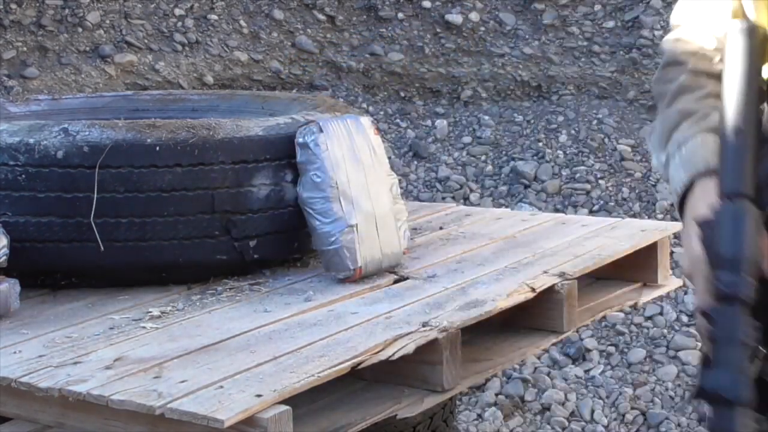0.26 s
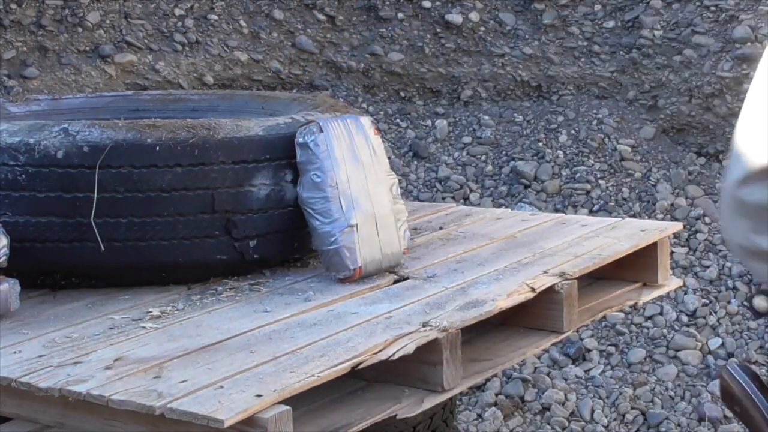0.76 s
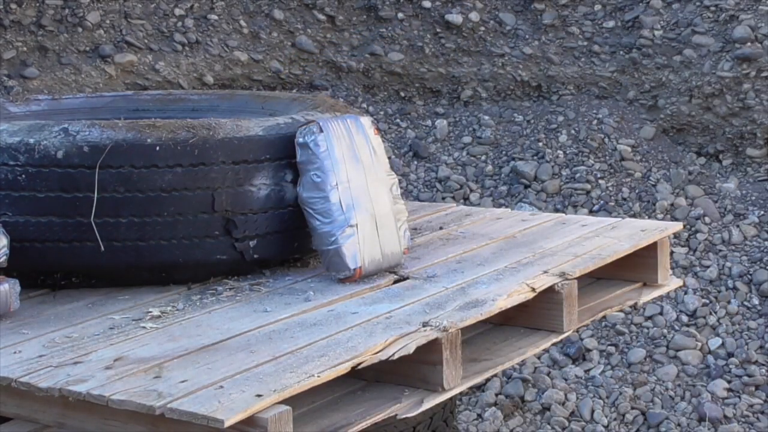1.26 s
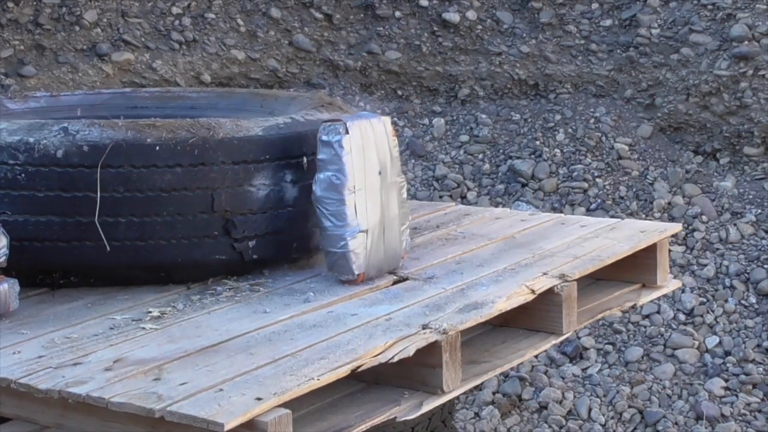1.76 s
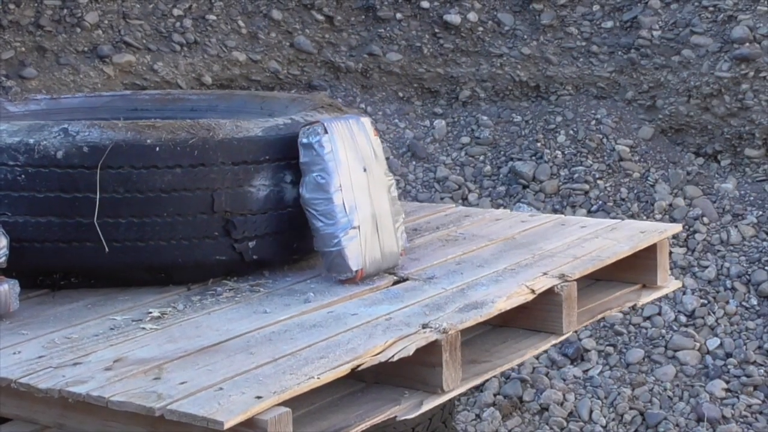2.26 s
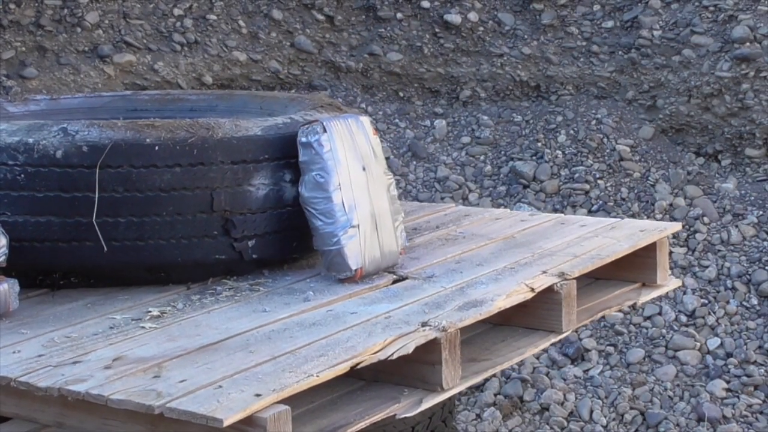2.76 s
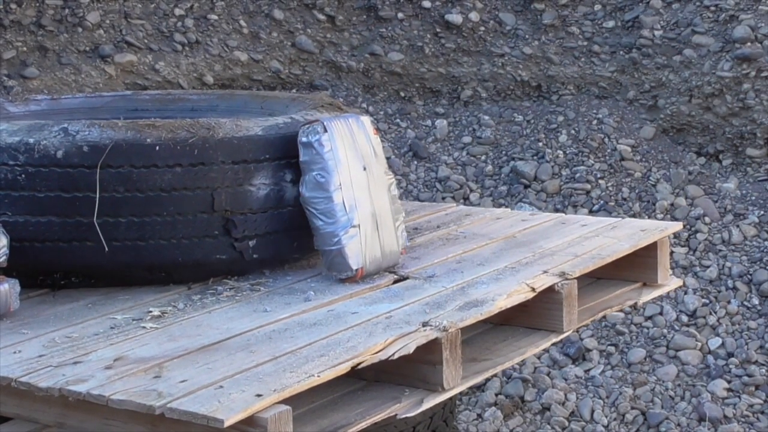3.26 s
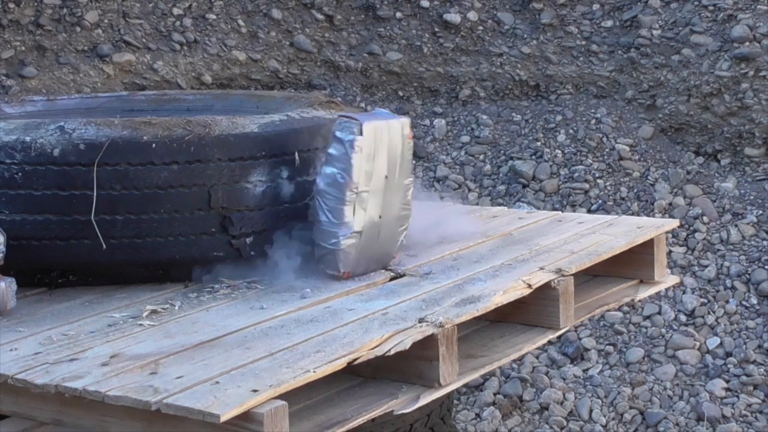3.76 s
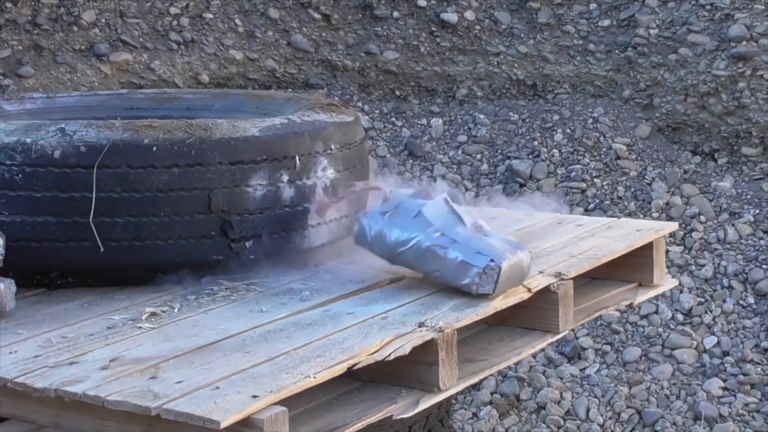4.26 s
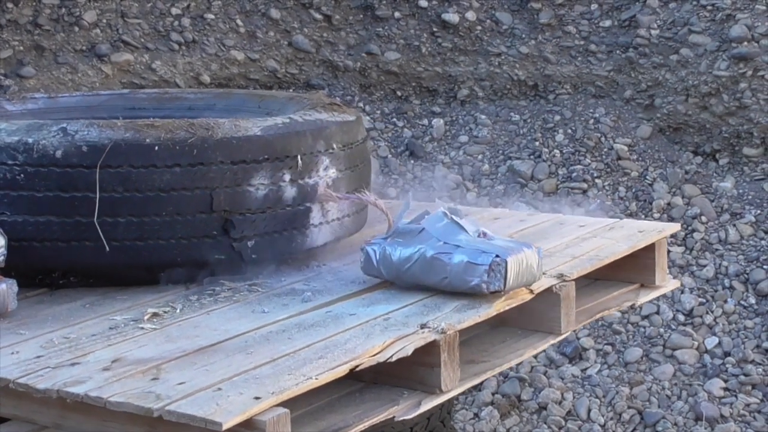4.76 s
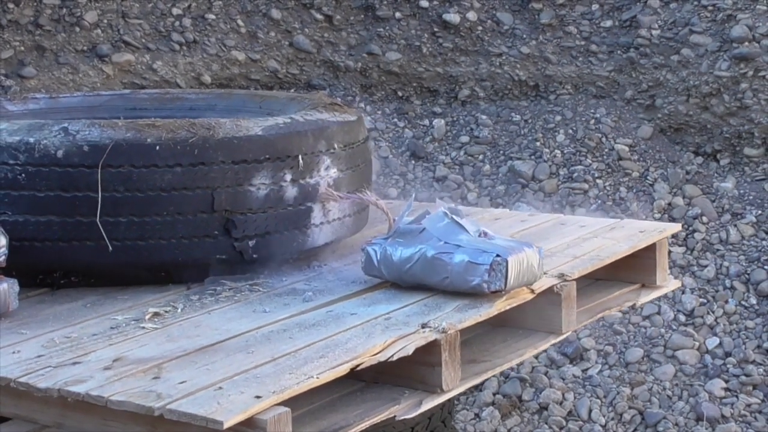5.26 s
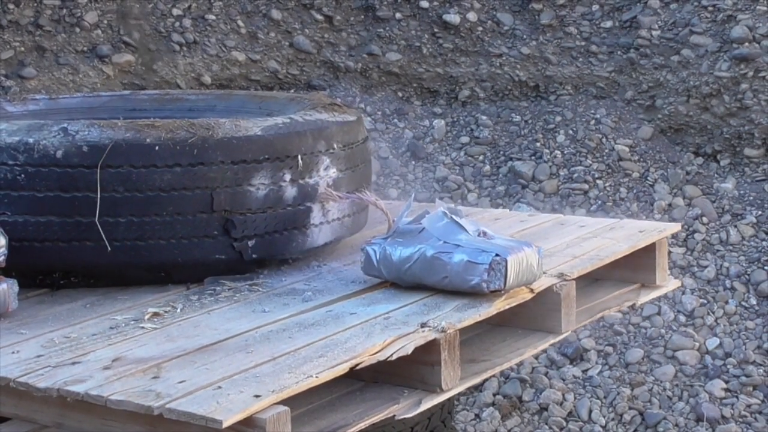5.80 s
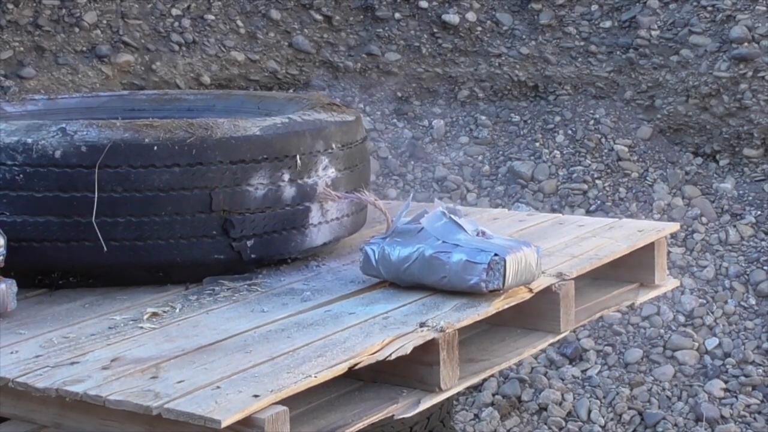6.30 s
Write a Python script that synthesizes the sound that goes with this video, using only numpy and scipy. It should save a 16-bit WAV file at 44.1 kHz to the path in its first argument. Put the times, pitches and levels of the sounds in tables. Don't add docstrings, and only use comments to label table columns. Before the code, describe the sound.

A close stereo microphone in an open gravel pit picks up faint air and a low murmur. From 0 to 1.1 seconds cloth rustles softly, with dull rifle-handling bumps, small grip taps and a very faint sinking whistle. At about 1.5 a rifle shot cracks and booms, extremely loud and squashed at its peak, then slaps off nearby banks, with a hollow metallic ring and dull far echoes. From 1.9 to 3.1 bright grit and splinters patter across both sides, brass tinkles thinly near 2.4 and 2.9, and a parcel rocks with muffled knocks. At 3.7 a second, similar shot erupts. Around 4.3 to 4.5 the parcel topples onto wooden boards with a sharp clatter, amid more debris and brass bounces, notably near 4.75. From 5.3 to the end at about 6.5, stones tick and trickle, gravel scrapes briefly, and a light woody thud lands near 5.9.

```python
import sys
import numpy as np
from scipy import signal
from scipy.fft import rfft, irfft, next_fast_len
from scipy.io import wavfile
from scipy.ndimage import uniform_filter1d, map_coordinates

SR = 44100
rng = np.random.default_rng(int(sys.argv[2]) if len(sys.argv) > 2 else 0)


def convert_level_to_amplitude(level_db):
    exponent = np.asarray(level_db, float) / 20
    return 10 ** exponent


def transcribe(signal):
    frames = np.atleast_2d(signal).T
    limited = np.clip(frames, -1, 1)
    pcm = np.round(limited * 32767).astype(np.int16)
    wavfile.write(sys.argv[1], SR, pcm)


N = 288325

# start in seconds, blast level in dB, fizz level in dB.
SHOTS = [
    (1.544, -8.5, -17),
    (3.7037, -8, -15.5),
]
# frequency in Hz, level in dB per Hz.
BLAST_COLOUR = [(24, -50.5), (40, -40.5), (80, -21), (113, -7), (250, -15.5), (325, -4), (500, -3),
                (719, -11.5), (841, -11.5), (916, -23), (1130, -17.5), (1830, -34), (2500, -35),
                (3250, -49.5), (5500, -120)]
FIZZ_COLOUR = [(1060, 5), (1800, -9.5), (2850, -10.5), (4530, -5.5), (5650, -9.5), (12500, -10),
               (15200, -17.5), (16300, -42.5)]
TAIL_COLOUR = [(18, -48.5), (30, -13), (129, 8), (293, 1.5), (342, 1.5), (805, -39.5), (877, -26),
               (955, -27.5), (1800, -36), (2340, -64), (3960, -120)]
FRAME_HZ = [253, 345, 525, 702, 877]
# level in dB, time to fall 60 dB in seconds, wander in turns.
FRAME_RINGS = [(-43, .9, .2), (-41, 2.1, .1), (-51, 2.1, .15), (-59, .8, .2), (-47, 1.3, .03)]
# delay in seconds, first pitch in Hz, last pitch in Hz, level in dB,
# length in seconds.
BANK_ECHOES = [(.18, 170, 147, -46, 0.076), (0.248, 129, 126, -40.5, 0.074), (0.349, 280, 223, -44, 0.061),
               (.41, 270, 285, -38, .055), (0.465, 253, 163, -33, 0.04)]
# pitch in Hz, gap to its twin pitch in Hz.
CASES = [
    (11685, 80),
    (11540, 68),
]
# start in seconds, peak level in dB, level of the higher pitch in dB.
BOUNCES = [(2.365, -19.5, -24.5), (2.873, -36, -18.5), (2.979, -41.5, -3.5), (4.316, -36, 6.5),
           (4.399, -29.5, -19), (4.499, -41, -5.5), (4.518, -40.5, -6), (4.753, -20, -25),
           (5.088, -47, -12), (5.309, -35.5, -22), (5.450, -44, -5.5)]
# start in seconds, peak level in dB, pitch in Hz.
SHARDS = [(2.010, -22, 10250), (2.02, -20, 10300), (2.033, -21, 10330), (5.198, -37, 9000)]
# start in
# seconds, peak level in dB, pitch in Hz, left-right in dB, time to fall 60 dB in seconds.
GRIT = [(1.8173, -37.5, 9230, 1, 0.035), (1.8856, -58, 8390, 2.5, 0.03),
        (1.9185, -49, 9580, 1.5, 0.03), (1.9629, -27.5, 9000, 4, 0.033), (1.9729, -26, 9720, 4, 0.03),
        (1.9934, -27, 3036, -4, 0.061), (2.0098, -16.5, 9930, -1, 0.09), (2.0874, -39, 9650, 5, 0.03),
        (2.1136, -26, 8900, -4, 0.035), (2.162, -30, 9720, 0.0, 0.036),
        (2.1994, -30, 7960, -0.5, 0.03), (2.2314, -34, 3480, -7, 0.03),
        (2.2674, -42, 5000, 1.5, 0.03), (2.2864, -29, 9390, 6, 0.03), (2.3034, -23, 9370, 1.0, 0.048),
        (2.3211, -26, 8620, 2.0, 0.03), (2.365, -19, 9620, -6, 0.03), (2.4423, -27, 4760, -5, 0.052),
        (2.4848, -27, 5700, -5, 0.03), (2.586, -42, 9750, 0.0, 0.03), (2.5985, -33.5, 4140, 8, 0.035),
        (2.6339, -38.5, 9260, 3, 0.03), (2.7104, -36.5, 6410, -4, 0.033),
        (2.7581, -25, 5130, 3, 0.045), (2.7714, -28.5, 8540, 7, 0.038),
        (2.7994, -31.5, 6690, 1, 0.035), (2.8344, -46, 9510, -2, 0.025), (2.8604, -29, 9400, 5, 0.03),
        (2.9337, -25, 7100, -6, 0.032), (2.9781, -29.5, 6630, -4, 0.036),
        (3.0804, -31, 5020, -3, 0.03), (3.0874, -21.5, 7950, 0, 0.044), (3.1094, -32, 4790, -2, 0.04),
        (3.1234, -32, 9840, -1, 0.028), (3.3897, -46.5, 9440, 6.5, 0.03),
        (3.4675, -41, 9830, 2.5, 0.029), (3.5109, -38.5, 7980, 0.5, 0.029),
        (3.5857, -45.5, 9250, 2, 0.034),
        (3.8911, -42, 4330, -6, 0.044), (3.9654, -36, 4500, 1.5, 0.04),
               (4.0108, -36, 5470, 1.5, 0.047), (4.0637, -38, 10200, 2.5, 0.04),
               (4.0836, -40, 4730, 1.0, 0.04), (4.0994, -33, 9030, 1.0, 0.056),
               (4.1574, -33.5, 9120, 6, 0.035), (4.2188, -34, 8310, 0.0, 0.045),
               (4.2527, -30.5, 10400, 0.0, 0.043), (4.2624, -33, 3330, -5, 0.035),
               (4.2824, -38, 10100, -2.0, 0.04), (4.2986, -21, 9780, 9, 0.033),
               (4.3156, -19, 9300, -1.0, 0.053), (4.366, -11, 4060, 3, 0.049),
               (4.4514, -28, 5570, -7, 0.04), (4.4618, -19.5, 7700, 0, 0.054),
               (4.4812, -17, 4370, 0.5, 0.026), (4.4964, -19.5, 3000, 2, 0.04), (4.58, -34, 7760, -3, 0.04),
               (4.6179, -39, 5160, -2, 0.04), (4.6588, -28, 10100, -1.5, 0.032),
               (4.6658, -21, 10300, 2, 0.025), (4.6784, -26.5, 3300, 1, 0.046),
               (4.6862, -26, 6990, -4, 0.043), (4.7014, -28.5, 4460, -5, 0.04),
               (4.7172, -28, 9170, 2.0, 0.046), (4.7884, -28, 3030, -1.5, 0.047),
               (4.8364, -44, 6250, 1, 0.036), (4.8569, -28.5, 10100, -7, 0.029),
               (4.9496, -17.5, 9380, 1, 0.076), (5.0025, -18, 5230, -4.5, 0.053),
               (5.0594, -23.5, 5040, -0.5, 0.022), (5.1317, -28.5, 5000, -3.5, 0.029),
               (5.1642, -31, 9500, -6, 0.04),
        (5.2794, -25, 6240, -4, 0.018), (5.2889, -27, 9220, 2, 0.042), (5.3941, -29.5, 8100, 0, 0.035),
           (5.4694, -35, 4040, -7.5, 0.026), (5.5199, -47.5, 7510, 1.5, 0.025),
           (5.5593, -31, 5090, -4, 0.046), (5.5664, -26.5, 8700, 3, 0.03), (5.6381, -47.5, 9400, 1, 0.03),
           (5.682, -23, 9600, 1.0, 0.042), (5.7304, -31, 10500, -1, 0.03), (5.7758, -41.5, 10930, -3, 0.03),
           (5.7888, -17, 7520, -1.5, 0.051), (5.8114, -35.5, 4370, 0.5, 0.044),
           (5.8601, -34, 10500, 2, 0.033), (5.882, -26.5, 7900, 0, 0.065),
           (5.9018, -28.5, 4600, -0.5, 0.038), (5.9484, -30, 4270, -5, 0.035),
           (5.9868, -33, 4760, 0.0, 0.04), (6.0162, -31.5, 10300, 2, 0.027),
           (6.0204, -36, 11000, 0.5, 0.026), (6.0492, -37, 4640, -2, 0.03), (6.0731, -39, 8200, 0.0, 0.017),
           (6.0945, -25.5, 9900, 1.5, 0.03), (6.136, -32, 10200, 0.5, 0.033), (6.1581, -26, 7390, 3, 0.074),
           (6.2011, -25.5, 10200, 2, 0.025), (6.2422, -31, 10200, 0.0, 0.034),
           (6.2618, -19, 9380, 7.5, 0.03), (6.2654, -26, 7460, 2, 0.045), (6.293, -33, 9210, 2, 0.035),
           (6.3415, -31.5, 8640, -3, 0.022), (6.4063, -39.5, 10700, -0.5, 0.03),
           (6.4428, -23.5, 10900, -2.5, 0.051), (6.4508, -25.5, 5260, 3, 0.048),
           (6.4852, -30, 6560, 1, 0.039), (6.506, -25.5, 9900, 2.0, 0.018)]
# start in seconds, level in dB, pitch in Hz, length in seconds.
SCRAPES = [(1.957, -39.5, 8100, 0.045), (2.023, -41, 8500, 0.13), (2.215, -42.5, 8000, 0.06),
           (4.354, -33, 4930, 0.048), (4.476, -36, 2950, 0.026), (2.298, -30.5, 9000, 0.0064),
           (2.314, -30.5, 8050, 0.022), (2.451, -33, 6650, 0.084), (3.488, -58, 7050, 0.081),
           (4.904, -41.5, 5000, 0.036), (5.282, -41, 7500, 0.04), (5.381, -50, 8000, 0.05),
           (5.555, -51, 6900, 0.071), (5.784, -42, 8000, 0.048), (5.87, -53, 7000, 0.15),
           (5.682, -36, 5900, 0.011), (6.084, -35.5, 6280, 0.026), (6.194, -38.5, 6030, 0.032),
           (6.328, -41, 5630, 0.037), (6.524, -21, 7600, 0.014)]
# start in seconds, peak level in dB, pitch in Hz, time to fall 60 dB in seconds.
ROCKING = [(1.932, -29, 1480, 0.082), (2.007, -26, 970, 0.16), (2.0095, -18.5, 1710, .02),
           (2.08, -31, 850, 0.12), (2.223, -23.5, 610, 0.23), (2.222, -27, 1000, .08),
           (2.7, -28.5, 1100, 0.087), (2.37, -30, 650, 0.094), (2.224, -19, 384, 0.15),
           (2.243, -23, 600, .1), (2.365, -25, 474, 0.24), (2.446, -21, 440, 0.22),
           (2.484, -34.5, 560, 0.2), (3.088, -33.5, 420, 0.093)]
# the same four columns,
# start in seconds, peak level in dB, pitch in Hz, time to fall 60 dB in seconds.
TOPPLING = [(3.619, -40, 835, 0.056), (3.905, -35, 1400, 0.045), (4.012, -36, 1490, 0.053),
            (4.1, -35, 1940, 0.045), (4.263, -34, 1800, 0.027), (4.28, -25.5, 1070, 0.08),
            (4.319, -23.5, 430, 0.36), (4.319, -25, 1130, 0.076), (4.341, -23.5, 298, 0.13),
            (4.369, -7, 840, 0.046), (4.374, -9, 1100, 0.071), (4.392, -22.5, 370, 0.21),
            (4.474, -21, 930, 0.16), (4.617, -22, 430, 0.057), (4.688, -25.5, 1140, 0.033),
            (4.705, -25, 388, 0.046), (4.79, -24.5, 1070, 0.051), (4.921, -20.5, 500, 0.093),
            (4.904, -35, 880, 0.34), (5.002, -23.5, 1110, 0.038), (5.278, -35, 1100, 0.091),
            (5.561, -38, 290, 0.19), (5.789, -42, 1060, 0.1), (5.933, -25.5, 523, 0.19),
            (6.05, -42, 494, 1), (6.19, -35.5, 610, 0.095), (6.427, -41.5, 640, 0.26),
            (6.526, -28, 1410, 0.1)]
# start in seconds, peak level in dB, pitch in Hz,
# time to fall 60 dB in seconds.
THUDS = [(2.151, -33.5, 464, 0.13), (2.23, -21, 446, 0.17), (2.44, -25, 453.3, 0.22),
         (4.33, -28.5, 85.5, 0.22), (4.485, -27.5, 473, 0.11), (4.518, -35, 72, 0.11),
         (5.93, -31, 157, 0.11), (5.936, -34, 359, 0.14), (5.949, -17, 240, 0.021)]
# start in seconds, peak level in dB.
GRIPS = [(.24, -41), (.31, -41.5), (.42, -50), (0.496, -39), (0.529, -36.5), (0.612, -26), (0.712, -32.5),
         (0.84, -40.5), (0.978, -37)]
# start in seconds, peak level in dB, pitch in Hz.
BUMPS = [(0.069, -63, 226), (0.127, -32.5, 220), (0.174, -30, 221), (0.209, -35, 227), (0.287, -37.5, 205)]
# time in seconds, whistle pitch in Hz, whistle level in dB,
# level of the 960 Hz hum in dB.
SWING = [
    (0, 2550, -62, -58),
    (.14, 2130, -66, -55),
    (.3, 1950, -90, -54),
    (.45, 1950, -110, -75),
]
# time in seconds, level in dB.
CLOTH_LEVEL = [(0.0, -56.5), (.12, -59), (0.27, -56.5), (0.36, -70.5), (0.612, -63.5), (0.924, -67),
               (0.974, -57.5), (1.1, -72)]
# frequency in Hz, level in dB per Hz.
CLOTH_COLOUR = [(880, -39.5), (1500, 0), (1800, -14.5), (3540, -3), (6570, -8.5), (11500, -12),
                (14000, -34), (16300, -47.5)]
PATTER_COLOUR = [(880, -26), (1500, -9.5), (2570, -7.5), (4240, -3), (5890, -5), (7190, -3.5), (10000, -4),
                 (11500, -3), (15500, -13.5), (16300, -48.5)]
STIR_COLOUR = [(15, -61.5), (25, -12), (168, -9), (221, -2), (283, -6.5), (324, -5), (371, -9), (425, -7),
               (973, -9), (2500, -26), (3250, -49), (5500, -120)]
AIR_COLOUR = [(15, -43), (25, -19), (55, -6), (138, -16), (237, -13), (702, -24.5), (921, -16),
              (1350, -24.5), (6140, -41), (12400, -27), (15000, -32), (16300, -40.5)]
# start in seconds, low air level in dB, patter level in dB.
MOMENTS = [
    (0, -55.5, -64),
    (1.093, -81, -68.5),
    (3.138, -72, -66.5),
]
# time after the shot in seconds, density in dB.
SHOWER = [(0, -45), (.21, -28), (.37, -9), (.6, -3), (.82, -1), (1.2, -3.5), (1.65, -11.5), (2.4, -11.5),
          (2.85, -14)]


def unit(x):
    return x / np.sqrt(np.mean(x ** 2) + 1e-20)


def filtered(x, response):
    m = next_fast_len(x.shape[-1] + 2 ** 11)
    spectrum = rfft(x, m) * response(np.fft.rfftfreq(m, 1 / SR))
    return irfft(spectrum, m)[..., :x.shape[-1]]


def band(x, hz, width_hz):
    return filtered(x, lambda f: 1j * f * width_hz / (hz * hz - f * f + 1j * f * width_hz))


def rush(colour, share, size):
    hz, db = np.transpose(colour)
    noise = rng.standard_normal((2, size))
    mid, side = filtered(noise, lambda f: convert_level_to_amplitude(np.interp(np.log(f + 1), np.log(hz), db)))
    return unit(np.array([mid + share * side, mid - share * side]))


def wobble(rate, size=N):
    knots = rng.standard_normal(int(size * rate / SR) + 4)
    return map_coordinates(knots, [np.arange(size) * rate / SR])


def add(out, s, sound, pan_db=0):
    at = round(s * SR)
    piece = (sound * convert_level_to_amplitude([[pan_db / 2], [-pan_db / 2]]))[:, :N - at]
    out[:, at:at + piece.shape[1]] += piece


def level_out(x, seconds):
    power = np.abs(uniform_filter1d(x ** 2, int(seconds * SR), axis=1))
    return unit(x / (power + .03) ** .42)


def shots():
    out, t = np.zeros((2, N)), np.arange(SR) / SR
    late = np.clip(t - .003, 0, None)
    over_db = 30 - 60 * late / 0.12
    squeeze_db = -3 * np.logaddexp(0, over_db / 3)
    rise = 1 - np.exp(-late / 0.0011) - 0.22 * np.exp(-late / 0.018) * (late > 0)
    rise = rise.clip(0)
    for s, blast_db, fizz_db in SHOTS:
        boom = level_out(rush(BLAST_COLOUR, share=0.42, size=SR), seconds=0.0042)
        blast = convert_level_to_amplitude(blast_db + over_db + squeeze_db) * rise * boom
        gas = rush(FIZZ_COLOUR, share=.8, size=SR)
        fizz = convert_level_to_amplitude(fizz_db + 38.5 - 60 * late / 0.083 + squeeze_db) * rise * gas
        snap = unit(band(rush(FIZZ_COLOUR, share=.7, size=SR), 5800, width_hz=4500))
        crack = convert_level_to_amplitude(-8 - 60 * t / .018) * snap
        haze = convert_level_to_amplitude(-52 - 60 * t / 1.1) * rush(FIZZ_COLOUR, share=.9, size=SR)
        tail = convert_level_to_amplitude(-36.5 - 60 * t / 1.5) * rise * rush(TAIL_COLOUR, share=0.16, size=SR)
        frame = frame_ring(t) * convert_level_to_amplitude(squeeze_db) * rise
        add(out, s, blast + fizz + crack + haze + tail + near_banks(t) + frame)
        add_far_bank(out, s, t)
    return out


def near_banks(t):
    lumps_db = 4 * wobble(70, size=SR)
    swell = 1 - np.exp(-(t / .085) ** 4)
    slap = unit(band(rush(BLAST_COLOUR, share=.4, size=SR), 480, width_hz=450))
    return convert_level_to_amplitude(-8 + lumps_db - 60 * t / .33) * swell * slap


def frame_ring(t):
    ring = 0
    for hz, (db, t60, wander) in zip(FRAME_HZ, FRAME_RINGS):
        fade = convert_level_to_amplitude(db - 60 * (t - .15) / t60 - 20 * (t / .42) ** 6)
        turns = hz * t + rng.random((2, 1)) / 3 + wander * wobble(40, size=SR)
        ring = ring + fade * np.sin(2 * np.pi * turns)
    return ring


def add_far_bank(out, s, t):
    for delay, first_hz, last_hz, db, length in BANK_ECHOES:
        done = np.clip(t / length, 0, 1)
        glide_hz = first_hz + (last_hz - first_hz) * done
        turns = np.cumsum(glide_hz) / SR + 0.1 * rng.random((2, 1))
        add(out, s + delay, convert_level_to_amplitude(db) * np.sin(np.pi * done) * np.sin(2 * np.pi * turns))


def brass():
    out, t = np.zeros((2, N)), np.arange(SR // 3) / SR
    rings = [(s, db, hz, 0.05, -30, 245) for s, db, hz in SHARDS]
    for s, db, upper_db in BOUNCES:
        hz, gap_hz = CASES[int(s > SHOTS[1][0])]
        t60 = 0.243 * convert_level_to_amplitude(-0.097 * (db + 50.5))
        rings.append((s, db, hz, t60, upper_db, gap_hz))
    for s, db, hz, t60, upper_db, gap_hz in rings:
        turn = 2 * np.pi * (rng.random((4, 1, 1)) + np.array([[0], [.27]]))
        drift, upper_drift = np.cumsum(rng.normal(0, [[0.038], [.04]], (2, len(t))), axis=1)
        pair = np.sin(2 * np.pi * hz * t + turn[0] + drift)
        pair = pair + 0.55 * np.sin(2 * np.pi * (hz + gap_hz) * t + turn[1])
        upper = np.sin(2 * np.pi * 15320 * t + turn[2] + upper_drift)
        upper = upper + .6 * np.sin(2 * np.pi * 15210 * t + turn[3])
        ring = convert_level_to_amplitude(-60 * t / t60) * pair + convert_level_to_amplitude(upper_db - 34 * t / t60) * upper
        add(out, s, convert_level_to_amplitude(db + 2.0) * ring)
    return out


def grit():
    out, t = np.zeros((2, N)), np.arange(SR // 18) / SR
    for s, db, hz, pan_db, t60 in GRIT:
        puff = rush(PATTER_COLOUR, share=0.99, size=len(t))
        chip = unit(band(puff, hz, width_hz=.5 * hz)) + .5 * puff
        fade = 1.71 * convert_level_to_amplitude(-60 * t / t60) + 0.7 * convert_level_to_amplitude(-60 * t / 0.0029)
        tick = 10 * min(hz / 7500, 1) * np.sin(2 * np.pi * hz * t) * np.exp(-.65 * hz * t)
        struck_stone = 0.066 * convert_level_to_amplitude(-60 * t / 0.0041) * unit(band(puff, 1270, width_hz=6800))
        add(out, s, convert_level_to_amplitude(db - 17.5) * (fade * chip + tick + struck_stone), pan_db)
    return out


def scrapes():
    out, t = np.zeros((2, N)), np.arange(SR // 5) / SR
    for s, db, hz, length in SCRAPES:
        swell = np.sin(np.pi * np.clip(t / length, 0, 1)) ** 2
        rub = rush(PATTER_COLOUR, share=0.92, size=len(t))
        add(out, s, convert_level_to_amplitude(db) * swell * unit(band(rub, hz, width_hz=0.83 * hz)))
    return out


def knocks():
    out, t = np.zeros((2, N)), np.arange(SR // 6) / SR
    blows = [(s, db, 326, 0.17, 0.37, -27.5) for s, db in GRIPS]
    blows += [(*row, -6.5, -34.5) for row in ROCKING]
    blows += [(*row, 0.52, -31) for row in TOPPLING]
    push_colour = [(60, -26), (300, 2.5), (1200, -1.5), (2200, -15.5), (5000, -21.5)]  # (Hz, dB per Hz)
    body_colour = [(30, -33), (100, -15.0), (200, 5.0), (400, -7), (2000, -71.5)]
    for s, db, hz, t60, pan_db, body_db in blows:
        swell = convert_level_to_amplitude(db - 15.5 - 60 * t / t60) * (1 - np.exp(-t / 0.00053))
        push = swell * rush(push_colour, share=0.27, size=len(t))
        body = swell * convert_level_to_amplitude(body_db + 22.0) * rush(body_colour, share=0.19, size=len(t))
        spot = band(push, hz, width_hz=.1 * hz)
        spot *= np.linalg.norm(push) / np.linalg.norm(spot)
        add(out, s, spot + 1.1 * push + body, pan_db)
    return out


def thuds():
    out, t = np.zeros((2, N)), np.arange(SR // 6) / SR
    for s, db, hz, t60 in THUDS:
        swell = convert_level_to_amplitude(db - 60 * t / t60) * (1 - np.exp(-t / 0.0072))
        add(out, s, swell * np.sin(2 * np.pi * hz * t + .5 * wobble(59, size=len(t))))
    return out


def handling():
    out, t, clock = np.zeros((2, N)), np.arange(SR // 8) / SR, np.arange(N) / SR
    for s, db, hz in BUMPS:
        swell = convert_level_to_amplitude(db - 60 * t / 0.037) * (1 - np.exp(-t / 0.0037))
        add(out, s, swell * np.sin(2 * np.pi * hz * t))
    s, hz, whistle_db, hum_db = np.transpose(SWING)
    whistle_hz = np.interp(clock, s, hz) + 50 * wobble(250)
    whistle = convert_level_to_amplitude(np.interp(clock, s, whistle_db)) * np.sin(2 * np.pi * np.cumsum(whistle_hz) / SR)
    hum = unit(band(rng.standard_normal((2, N)), 960, width_hz=70))
    hum = convert_level_to_amplitude(np.interp(clock, s, hum_db, right=-120)) * hum
    cloth_s, cloth_db = np.transpose(CLOTH_LEVEL)
    rub_db = np.interp(clock, cloth_s, cloth_db, right=-120) + 1.5 * wobble(60)
    cloth = convert_level_to_amplitude(rub_db) * rush(CLOTH_COLOUR, share=0.4, size=N)
    return out + cloth + whistle + hum


def dust():
    fall = rush(PATTER_COLOUR, share=1.0, size=N)
    grains = 0
    for hz in (4500, 8000, 12000):
        landed = rng.random(N) < 160 / SR
        hits = landed * convert_level_to_amplitude(3.5 * rng.exponential(size=N).clip(0, 3))
        shape = signal.lfilter([1], [1, -np.exp(-1 / (0.00091 * SR))], hits)
        layer = band(fall, hz, width_hz=0.83 * hz)
        clumps = 0.85 * convert_level_to_amplitude(2.5 * wobble(16))
        grains = grains + unit(shape * layer) + clumps * unit(layer)
    return unit(convert_level_to_amplitude(2.2 * wobble(14)) * (.45 * fall + .8 * grains))


def background():
    clock = np.arange(N) / SR
    starts, low_db, patter_db = np.transpose(MOMENTS)
    moment = np.searchsorted(starts, clock, side="right") - 1
    low, patter = convert_level_to_amplitude(low_db[moment]), convert_level_to_amplitude(patter_db[moment])
    for s, *_ in SHOTS:
        since = np.clip(clock - s, 0, None)
        heard = (clock > s) & (moment == moment[round(s * SR)])
        density_db = np.interp(since, *np.transpose(SHOWER))
        murmur = convert_level_to_amplitude(-55.5 - 2.5 * since) * (1 - np.exp(-since / .15))
        stirred = convert_level_to_amplitude(-46.5 + 5.8 * density_db)
        low = low + heard * (murmur + stirred)
        patter = patter + heard * convert_level_to_amplitude(-42 + density_db)
    fade_s = .04
    low, patter = uniform_filter1d(np.array([low, patter]), int(fade_s * SR), axis=1)
    lumps = convert_level_to_amplitude(3 * wobble(30) + 1.5 * wobble(9))
    stir = low * lumps * rush(STIR_COLOUR, share=0.66, size=N)
    air = convert_level_to_amplitude(-64.0) * rush(AIR_COLOUR, share=1.0, size=N)
    return air + stir + patter * dust()


def scene():
    return shots() + brass() + grit() + scrapes() + knocks() + thuds() + handling() + background()


def low_pass(x):
    return signal.sosfilt(signal.butter(12, 16460, fs=SR, output="sos"), x)


def record(dry):
    heard = filtered(dry, lambda hz: (1j * hz / (55 + 1j * hz)) ** 2)
    top = 1.1
    rounded = heard / (1 + np.abs(heard / top) ** 4) ** (1 / 4)
    mix = filtered(rounded, lambda hz: 1 / (1 + (hz / 15700) ** 40))
    return low_pass(mix)


dry = scene()
out = record(dry)
transcribe(out)
```